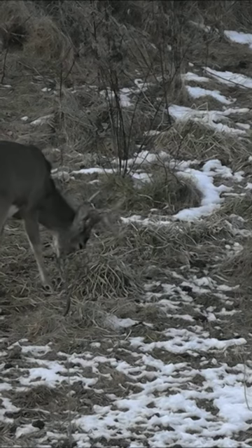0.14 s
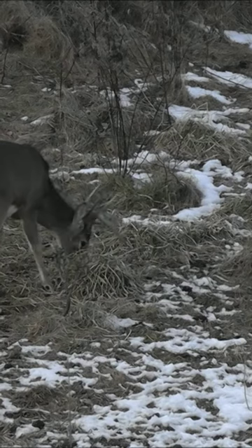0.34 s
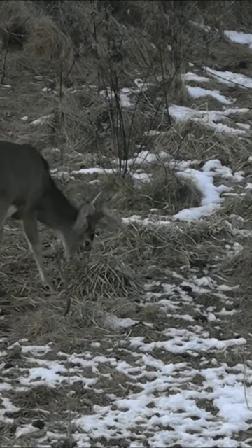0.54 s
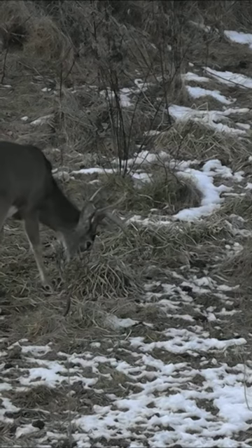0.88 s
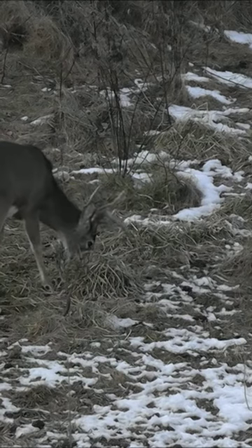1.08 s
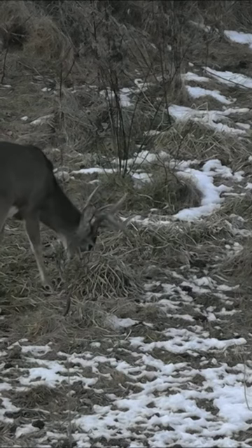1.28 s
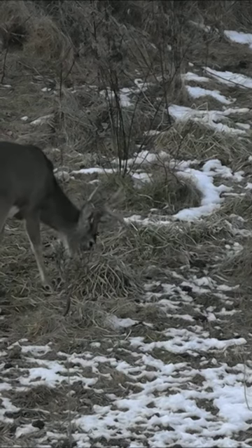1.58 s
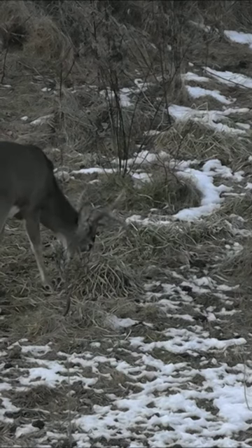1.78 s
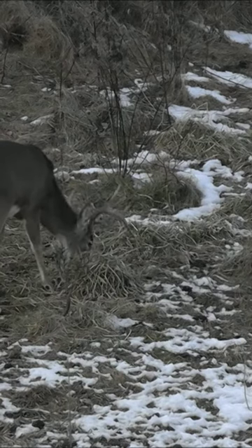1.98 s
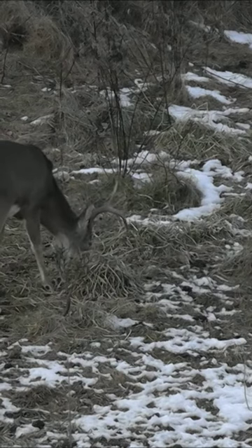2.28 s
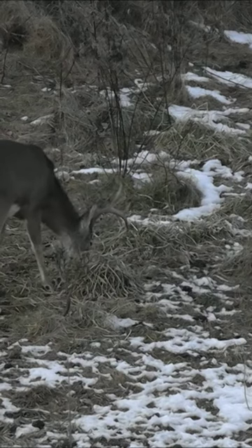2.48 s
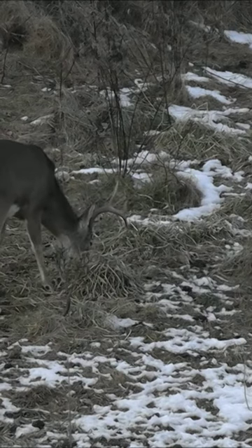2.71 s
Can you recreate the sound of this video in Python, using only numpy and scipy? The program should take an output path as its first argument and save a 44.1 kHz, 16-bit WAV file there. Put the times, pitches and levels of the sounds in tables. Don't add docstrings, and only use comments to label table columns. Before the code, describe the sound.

A distant propeller aircraft drones throughout, a low pulsing hum growing fuller from about 0.7 s, over soft outdoor air and faint hiss. Grass rustles until 0.7 s, with a tiny latch click at 0.12 and a thin click at 0.62. A faint high motor whine enters near 1 s. Close by, a soft knock at 1.4, tick at 1.7, light knock at 2.3, then a sharp, dry bow-release snap at 2.8.

```python
import sys
import numpy as np
from scipy import signal
from scipy.fft import rfft, irfft
from scipy.io import wavfile
from scipy.ndimage import uniform_filter1d

SR = 44100
rng = np.random.default_rng(int(sys.argv[2]) if len(sys.argv) > 2 else 0)


def volts_from_decibels(level):
    exponent = np.asarray(level, float) / 20
    return 10 ** exponent


def wrap_up_sound(samples):
    columns = np.atleast_2d(samples).T
    tamed = np.clip(columns, -1, 1)
    steps = np.round(tamed * 32767).astype(np.int16)
    wavfile.write(sys.argv[1], SR, steps)


N = 125685
T = np.arange(N) / SR
HZ = np.fft.rfftfreq(N, 1 / SR)
RUSTLE_END_S = 0.68
LOW_REF_DB, HIGH_REF_DB = -51.5, -57.5


def table(points, hz):
    p = np.array(points, float)
    return np.interp(np.log(np.maximum(hz, 1)), np.log(p[:, 0]), p[:, 1])


def walk(rate_hz):
    k = max(int(SR / rate_hz), 2)
    w = uniform_filter1d(uniform_filter1d(rng.standard_normal(N), k), k)
    return w / w.std()


# time in seconds, blade rate in Hz, low swell in dB, high swell in dB.
PROPELLER = [(0, 74.5, -64.5, -60.5), (.15, 74.8, -64, -64.5), (.3, 74.84, -65.5, -63),
             (.45, 75, -62.5, -65), (.62, 75.14, -62, -68.5), (.75, 74.72, -57, -68),
             (.95, 74.85, -53, -56), (1.248, 74.55, -52, -59.5), (1.578, 74.24, -50.5, -58),
             (1.798, 74.6, -51, -73), (1.95, 74.41, -52.5, -62), (2.148, 74.35, -50.5, -52.5),
             (2.5, 74.06, -53, -54.5), (2.85, 74.16, -52.5, -55.5)]
# multiple of the blade rate, level in dB, share of low swell (negative moves against
# it), share of high swell (0-1), left-right difference in dB.
BLADE_HARMONICS = [(1, -25.5, 1, 0.011, 2.5), (2, -4.5, 0.53, 0.0089, 8.5), (3, -0.5, 0.92, 0.0066, 9.5),
                   (4, -16.5, 0.88, 0.39, 9), (5, -6, 0.17, 0.78, 6), (6, -14, -0.13, 0.045, 7),
                   (7, -22, 0.1, .5, 10), (8, -21, 0.1, 0.76, 12.5), (10, -31, -0.38, 0.4, 15)]
# time in seconds, sixth, seventh and eighth in dB.
GROUND_ECHO = [(0, 3, -2, 5.5), (.32, 4.5, -7, 4.5), (.55, -5, 9, 8), (.7, -11, 0, 10), (1.1, 1.5, -0.5, 1),
               (1.25, -2.5, -1.5, -11), (1.55, 0.5, -14, -15), (1.66, -1, 4.5, -10), (1.9, -0.5, -1, -8),
               (2.15, -1.5, 1, -0.5), (2.4, 4, 1, 2), (2.6, -2, 3, -1), (2.85, 2, 7, -2)]


def aircraft():
    level_db, fade_db, fade_hz = -48.5, 0.8, 9
    fade_rise = 0.52
    wobble_rad, wobble_hz = 0.18, 14
    pulse_s = 2.3279
    time, rate, low, high = np.array(PROPELLER, float).T
    rate, low, high = (np.interp(T, time, column) for column in (rate, low, high))
    echo = np.array(GROUND_ECHO, float)
    phase = 2 * np.pi * np.cumsum(rate) / SR
    phase = phase - phase[int(pulse_s * SR)]
    out = 0
    for k, db, low_share, high_share, lean_db in BLADE_HARMONICS:
        swell_db = low_share * (low - LOW_REF_DB) + high_share * (high - HIGH_REF_DB)
        fading_db = fade_db * (1 + fade_rise * max(k - 3, 0)) * walk(fade_hz)
        gain = volts_from_decibels(level_db + db + swell_db + fading_db)
        if 6 <= k <= 8:
            gain = gain * volts_from_decibels(np.interp(T, echo[:, 0], echo[:, round(k) - 5]))
        tone = gain * np.sin(round(k) * phase + wobble_rad * walk(wobble_hz))
        out = out + tone * volts_from_decibels(np.array([[lean_db], [-lean_db]]) / 2)
    return out


# frequency in Hz, level in dB per Hz.
AIR_SPECTRUM = [(22, -29), (60, -11), (130, 0.04), (210, -5), (450, -9), (870, -12), (1400, -24),
                (3000, -32), (6000, -40), (15500, -60)]
# frequency in Hz, difference in dB.
AIR_BALANCE = [(30, 5.8), (150, 7), (500, 5.5), (1000, 1.2), (2000, -.3), (12000, .1)]
# frequency in Hz, coherence (0-1).
AIR_COHERENCE = [(30, 0.31), (100, 0.73), (300, 0.91), (900, 0.057), (2000, 0.23), (4500, 0.93),
                 (8000, 0.99)]
# time in seconds, level in dB.
AIR_DRIFT = [(0, 0.5), (.8, 0), (1.0, 0), (1.9, -0.5), (2.1, 1), (2.3, 0), (2.58, 2), (2.85, .3)]


def air():
    level_db, gust_db, flicker_db, rustle_db = -54.5, 0.43, -1.74, 1
    roar_share, roar_top_hz = 0.22, 157
    a, b = rfft(rng.standard_normal((2, N)))
    like = np.clip(table(AIR_COHERENCE, HZ), 0, 1)
    lean = table(AIR_BALANCE, HZ) / 2
    mid, side = np.sqrt(1 + like) * a, np.sqrt(1 - like) * b
    ears = volts_from_decibels(table(AIR_SPECTRUM, HZ)) * np.array([(mid + side) * volts_from_decibels(lean), (mid - side) * volts_from_decibels(-lean)])
    time, _, low, _ = np.array(PROPELLER, float).T
    roar = roar_share * (np.interp(T, time, low) - LOW_REF_DB)
    rustle = rustle_db / (1 + np.exp((T - RUSTLE_END_S) / 0.1))
    drift = np.interp(T, *np.array(AIR_DRIFT).T)
    octave, gust, out = np.log2(np.maximum(HZ, 1) / 30), walk(0.54), 0
    for k in range(10):
        centre_hz = 30 * 2.0 ** k
        share = np.clip(1 - abs(octave - k), 0, 1)
        reach = 1 / (1 + (centre_hz / 1500) ** 2)
        swell_db = reach * (drift + gust_db * gust + flicker_db * walk(9.7))
        swell_db = swell_db + (0.5 - reach) * rustle + roar / (1 + (centre_hz / roar_top_hz) ** 2)
        out = out + irfft(ears * share, N) * volts_from_decibels(swell_db)
    return out * volts_from_decibels(level_db) / out.std()


# frequency in Hz, width in Hz, level in dB.
RUSTLE_BANDS = [(1790, 820, -80), (2630, 200, -86.5), (3240, 170, -84), (4190, 150, -86)]


def rustle_ring():
    fade, out = 1 / (1 + np.exp((T - RUSTLE_END_S) / 0.061)), 0
    for hz, width, db in RUSTLE_BANDS:
        edges = [hz - width / 2, hz + width / 2]
        sos = signal.butter(2, edges, "band", fs=SR, output="sos")
        band = signal.sosfilt(sos, rng.standard_normal(N))
        out = out + band / band.std() * volts_from_decibels(db + 3.6 * walk(25))
    return out * fade


# frequency in Hz, level in dB per Hz.
HISS_SPECTRUM = [(500, -28), (3000, -6), (5800, -3), (7300, 1), (8800, 0), (15500, -1.5)]


def hiss():
    level_db, like = -72.5, 0.52
    common, *own = rng.standard_normal((3, N))
    noise = np.sqrt(like) * common + np.sqrt(1 - like) * np.array(own)
    x = irfft(rfft(noise) * volts_from_decibels(table(HISS_SPECTRUM, HZ)), N)
    return x * volts_from_decibels(level_db) / x.std()


# frequency in Hz, width in Hz, gain in dB.
HOUSING_MODES = [(1790, 130, -7), (1920, 90, 4), (2370, 160, -7), (2620, 180, 6.5), (2850, 250, -2),
                 (3070, 110, -12), (3220, 240, 8), (4500, 200, -2), (4980, 300, 3), (6230, 130, 3.5),
                 (6850, 500, 3.5), (7350, 200, 2), (8090, 60, 4)]


def housing(x):
    shell_db = sum(db / (1 + (2 * (HZ - f) / width) ** 2) for f, width, db in HOUSING_MODES)
    return irfft(rfft(x) * volts_from_decibels(shell_db), N)


# frequency in Hz, rms level in dB.
WHINE_TONES = [(1694, -89), (1811, -94), (1932, -91), (3622, -93), (4167, -97), (4197, -96), (7244, -99),
               (7852, -98), (7882, -97)]


def whine():
    motor_hz, motor_db, motor_on_s = 5433, -83.5, 1.0

    def tone(hz, db):
        level = np.sqrt(2) * volts_from_decibels(db + 0.93 * walk(1.0))
        return level * np.sin(2 * np.pi * (hz * T + rng.random()))

    motor = tone(motor_hz, motor_db) / (1 + np.exp((motor_on_s - T) / 0.33))
    return sum(tone(hz, db) for hz, db in WHINE_TONES) + motor


def add(out, sound, at_s, lean_db, lag_ms):
    for ch, (side, late) in enumerate([(1.0, 0), (0.16, lag_ms / 1000)]):
        i = int(at_s * SR) - 20
        age = np.arange(i, min(i + 4000, N)) / SR - at_s - late
        out[ch, i:i + len(age)] += volts_from_decibels(side * lean_db) * sound(np.maximum(age, 0)) * (age > 0)


def burst(kind, edge_hz, fade_s):
    sos = signal.butter(4, edge_hz, kind, fs=SR, output="sos")
    grit = signal.sosfilt(sos, rng.standard_normal(4100))
    return lambda age: grit[(age * SR).astype(int)] * np.exp(-age / fade_s)


def modes(age, rows):
    fall = np.log(1000)
    return sum(volts_from_decibels(db) * np.exp(-fall * age / t60) * np.sin(2 * np.pi * hz * age) for hz, db, t60 in rows)


# frequency in Hz, level in dB, t60 in seconds.
LATCH_MODES = [(4480, -57, .008), (4860, -48.5, .012), (5300, -58, .01), (5800, -55, .008)]
# start in seconds, peak level in dB, lowest frequency in Hz.
DRY_CLICKS = [
    (.1209, -52, 7000),
    (.617, -52, 11500),
]


def latch_and_clicks(out):
    add(out, lambda age: modes(age, LATCH_MODES) * (1 - np.exp(-age / 0.00025)), 0.1208, 0, 0.05)
    for at_s, db, low_hz in DRY_CLICKS:
        spit = burst("high", low_hz, 0.001)
        add(out, lambda age: volts_from_decibels(db) * spit(age), at_s, 0, 0.03)


# start in seconds, peak level in dB, frequency in Hz, swell in seconds, right lag in ms.
BOW_TICKS = [
    (.1272, -67, 5000, .0018, .05),
    (.193, -68, 4050, .0015, .02),
    (1.6914, -43, 1170, .0021, -.13),
    (2.8101, -46, 290, .006, .01),
    (2.396, -58, 650, .003, .01),
]


def ticks(out):
    for at_s, db, hz, swell, lag_ms in BOW_TICKS:
        def slip(age):
            envelope = 2.36 * age / swell * np.exp(-(age / swell) ** 2)
            return volts_from_decibels(db) * envelope * np.sin(2 * np.pi * hz * age)

        add(out, slip, at_s, 0, lag_ms)


# frequency in Hz, level in dB, t60 in seconds.
RISER_MODES = [(288, -9, .07), (802, 1, .055), (1000, -10.5, .1), (1425, -12.5, .025), (1590, -11, .022),
               (1880, -15, .014), (2165, -14, .018), (2600, -15, .014), (3334, -22, .03), (3520, -7, .0045),
               (4320, -17, .012), (4685, -15, .0056), (5517, -21, .018), (6050, -8.5, .004)]
# start in seconds, crack in dB, ring in dB, left-right difference in dB, right lag in ms.
RISER_KNOCKS = [
    (1.4095, -55, -55.5, 1.5, .04),
    (2.3212, -45, -53, 2.5, -.08),
    (2.80387, -38, -37.5, .8, .01),
]


def knocks(out):
    ring_top_hz = 1200
    contact_s, bounce_s, bounce_db = 0.00008, 0.00084, -5
    slip_s, slip_db = 0.0011, -14
    crack_db_rel, crack_s, crack_top_hz = -19, 0.0025, 6500
    grip_s, grip_t60_s = 0.0076, 0.014
    dull_per_khz = 0.5
    glancing_s, thin_db, thin_hz = 2.3212, -6, 2400
    body = [m for m in RISER_MODES if m[0] < ring_top_hz]
    shell = [m for m in RISER_MODES if m[0] >= ring_top_hz]
    for at_s, crack_db, ring_db, lean_db, lag_ms in RISER_KNOCKS:
        soft = dull_per_khz * (RISER_KNOCKS[-1][1] - crack_db)
        dulled = []
        for hz, db, t60 in shell:
            thin = thin_db * (at_s == glancing_s and hz < thin_hz)
            dulled.append((hz, db - soft * max(hz / 1000 - 3.8, 0) ** 2 + thin, t60))
        grit = burst("low", crack_top_hz, crack_s)

        def strike(age):
            crack = modes(age, dulled) + volts_from_decibels(crack_db_rel - soft) * grit(age)
            return crack * (1 - np.exp(-age / contact_s))

        def ring(age):
            choke = np.exp(-np.log(1000) * np.maximum(age - grip_s, 0) / grip_t60_s)
            return volts_from_decibels(ring_db) * modes(age, body) * choke

        add(out, ring, at_s - contact_s, lean_db, lag_ms)
        for delay_s, blow_db in [(-slip_s, slip_db), (0, 0), (bounce_s, bounce_db)]:
            add(out, lambda age: volts_from_decibels(crack_db + blow_db) * strike(age), at_s + delay_s, lean_db, lag_ms)


def close_sounds():
    out = np.zeros((2, N))
    latch_and_clicks(out)
    ticks(out)
    knocks(out)
    return signal.sosfilt(signal.butter(2, 130, "high", fs=SR, output="sos"), out)


def scene():
    return housing(air() + hiss()) + aircraft() + whine() + close_sounds() + rustle_ring()


def band_limit(x):
    return signal.sosfilt(signal.butter(12, 15970, fs=SR, output="sos"), x)


def record(dry):
    mix = signal.sosfilt(signal.ellip(8, 0.2, 70, 15500, fs=SR, output="sos"), dry)
    return band_limit(mix)


dry = scene()
out = record(dry)
wrap_up_sound(out)
```